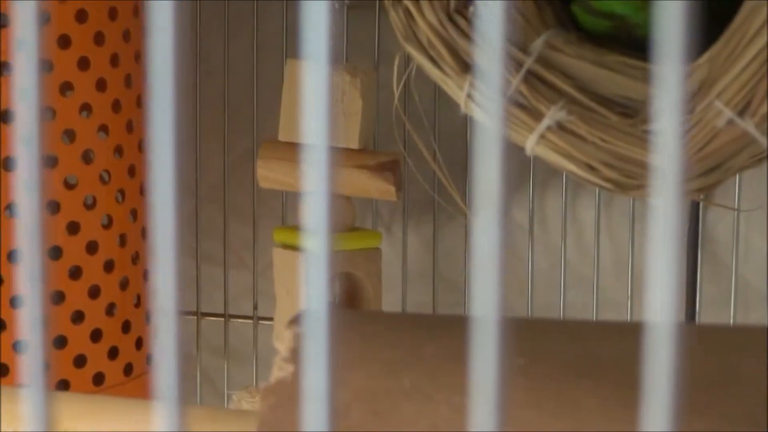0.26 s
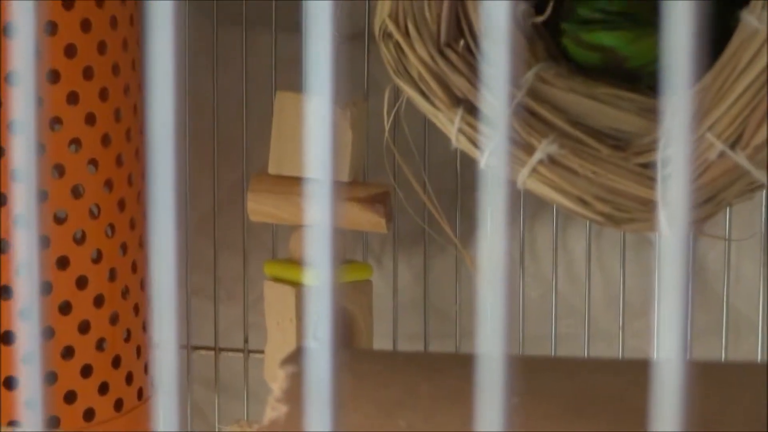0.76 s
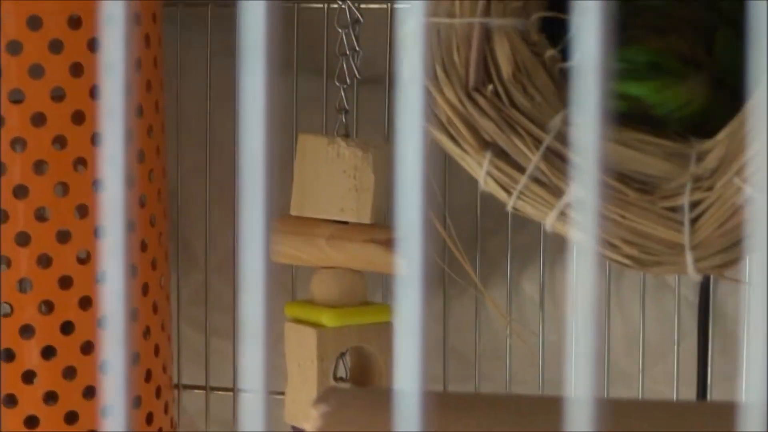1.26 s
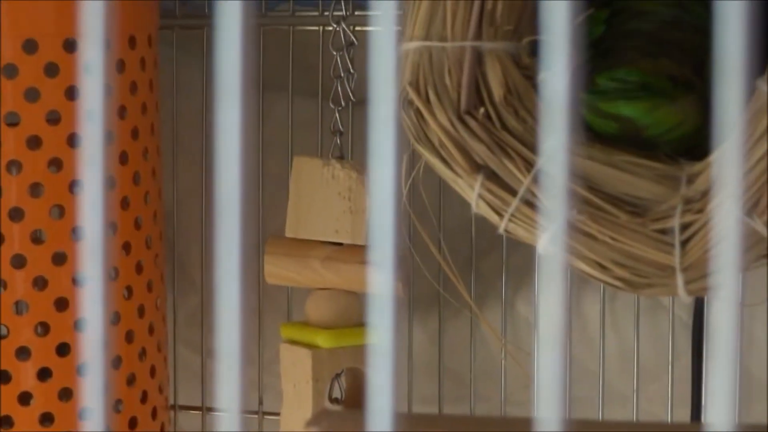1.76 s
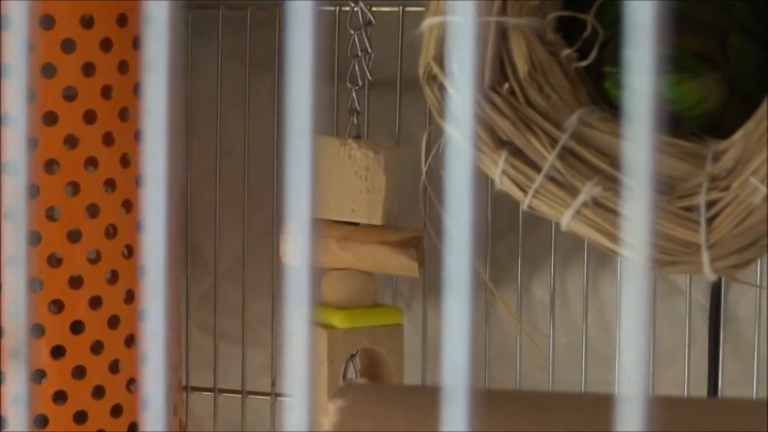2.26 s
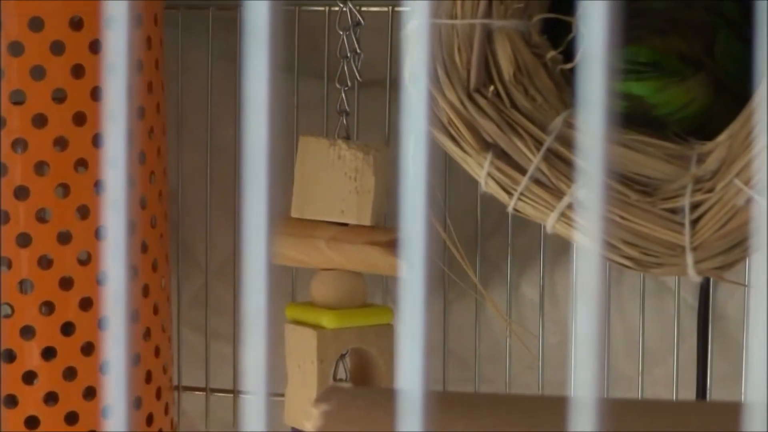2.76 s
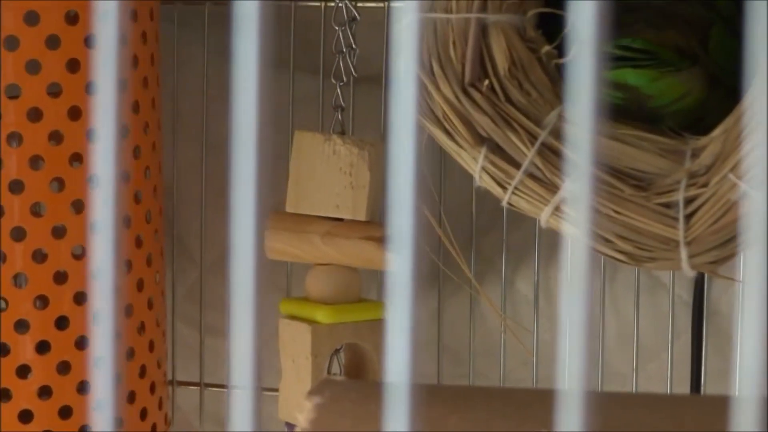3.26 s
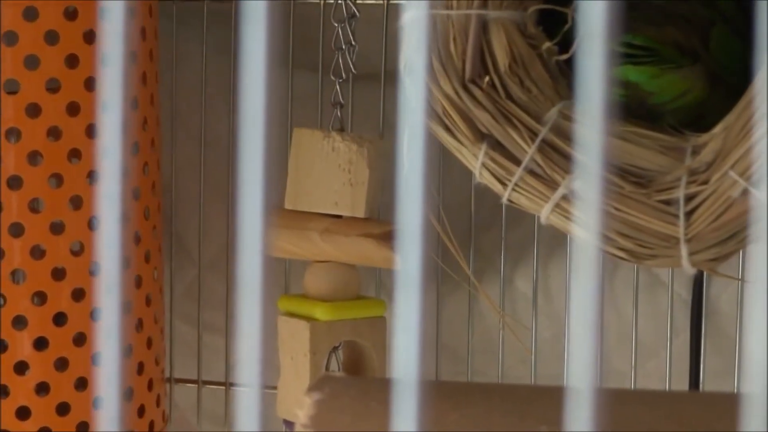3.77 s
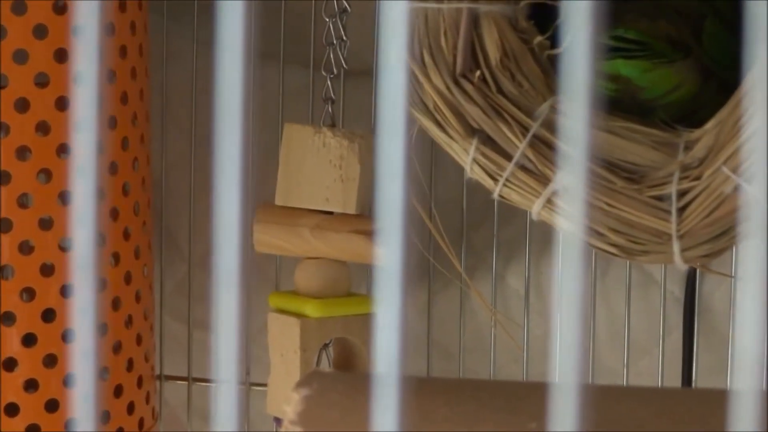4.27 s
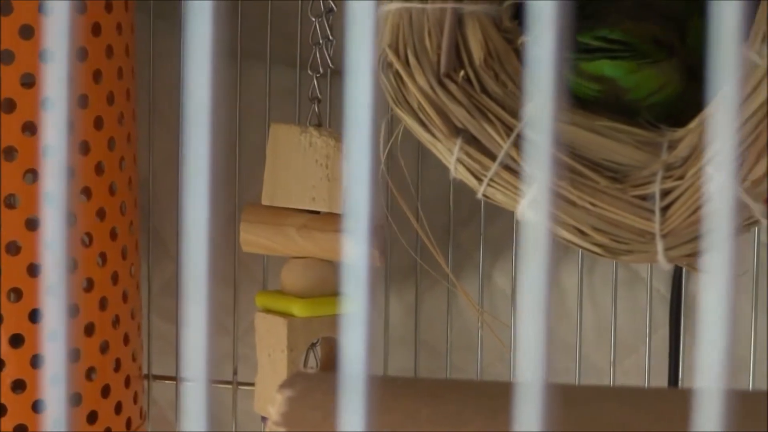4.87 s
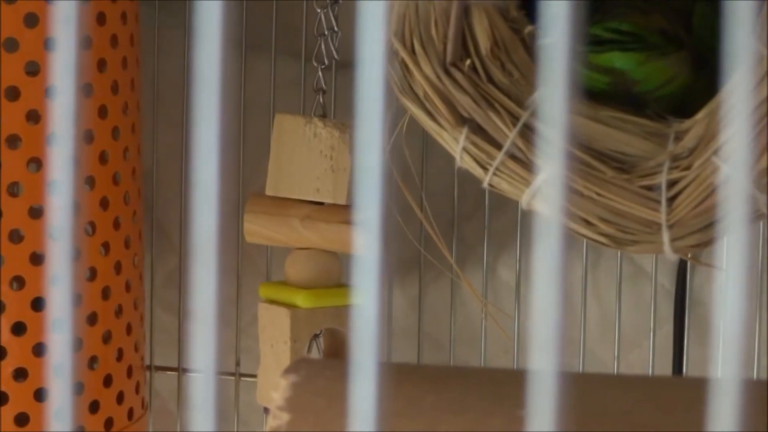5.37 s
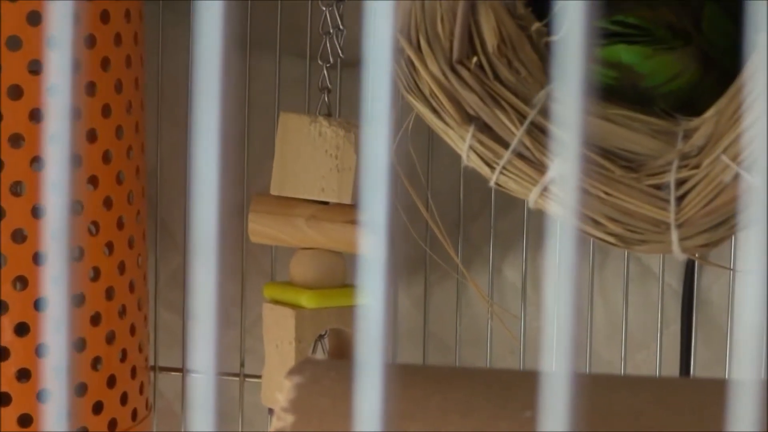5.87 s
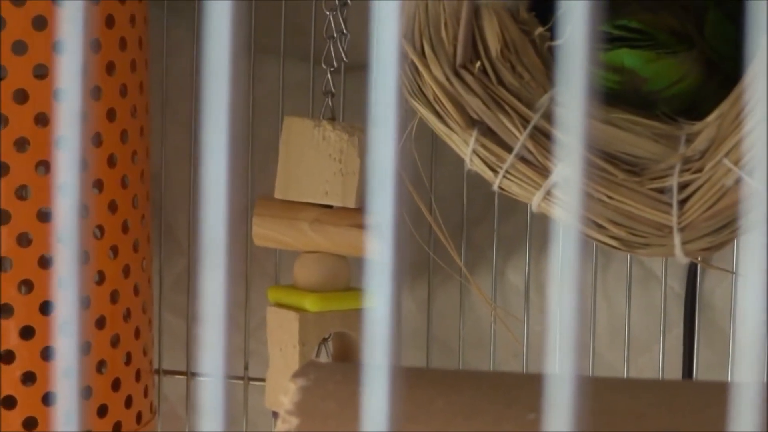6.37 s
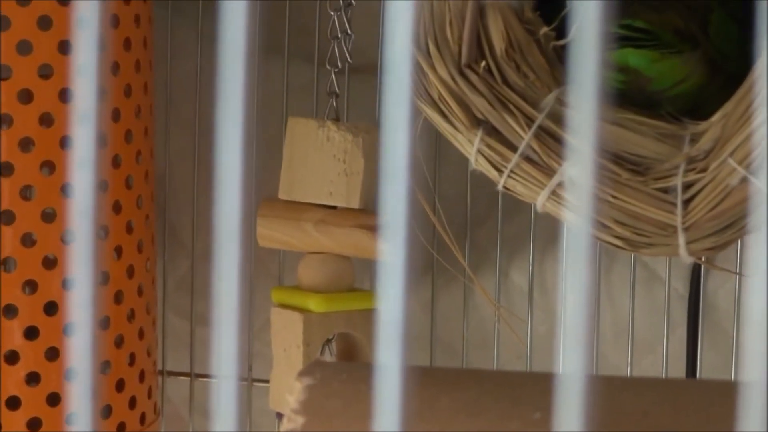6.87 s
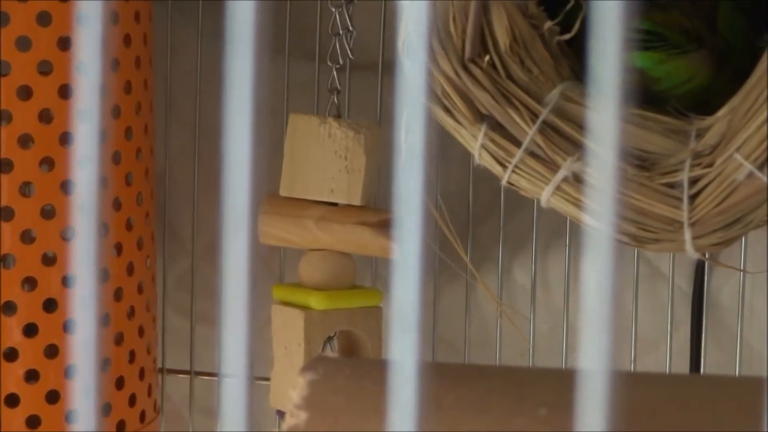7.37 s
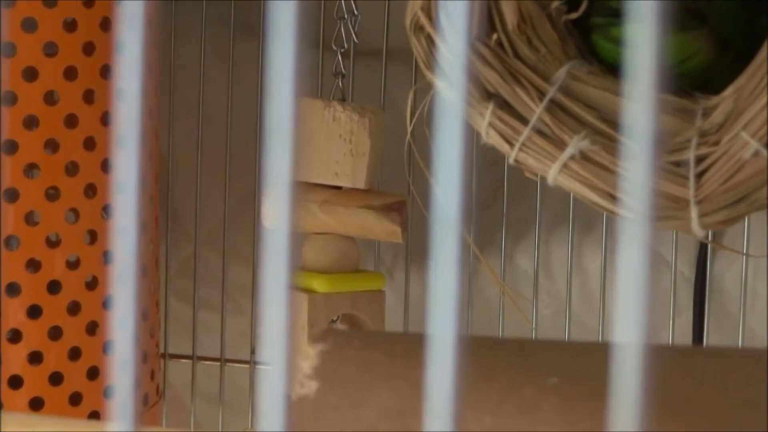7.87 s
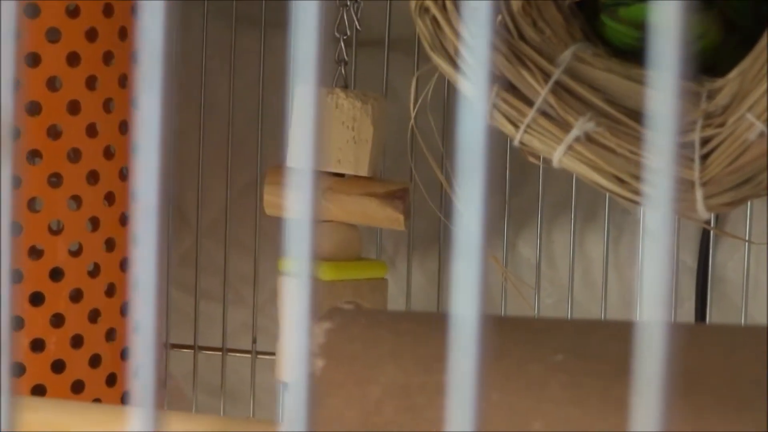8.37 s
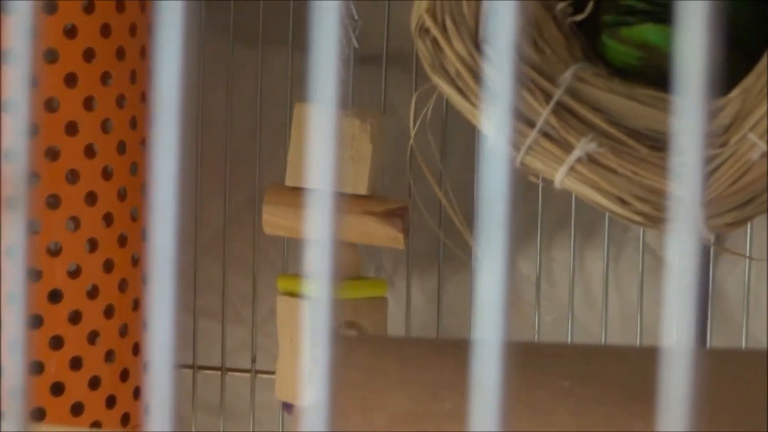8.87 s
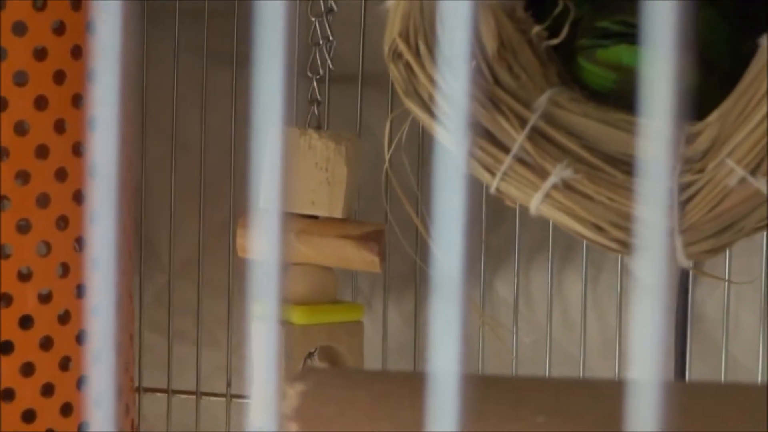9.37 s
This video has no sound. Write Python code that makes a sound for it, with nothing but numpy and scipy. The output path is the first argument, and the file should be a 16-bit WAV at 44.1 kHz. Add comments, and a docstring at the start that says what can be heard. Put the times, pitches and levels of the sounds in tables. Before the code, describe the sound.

A soft, airy hush of a quiet room runs throughout, for about ten seconds. In the first half second there is a faint rustle and a small tick from a cage. From about 0.7 to 2.4 seconds a small parrot, close and slightly to the right, gives a string of tiny chirps, roughly five a second, sinking in pitch. Two clear, gently arched peeps follow at 2.5 and 2.8 seconds, then one very faint chirp at 3. Quick bursts of high, sliding warble, hoarse at moments, come at about 4.3 and 5 seconds, with a shorter third at 7.2. A faint dull bump falls at 5.7 seconds and a light tick at 8.1. Near 8.8 seconds the bird makes a short, rattling buzz that rises in pitch, and then only the hush remains. The calls carry a slight, short room echo.

```python
"""An airy hush and faint ticks in a cage come first, in a quiet room. Close by, a small dozing parrot
gives tiny chirps that sink in pitch, two clear peeps, three bursts of sliding warble and a rising buzz.
All its calls follow the source-filter principle: the harmonics of the syrinx, steered by pitch and
effort, slide through the fixed resonances of the throat. Modulation adds flutter and turbulence rasp.
The cage, a near wall and a short room tail reflect the sound."""
import sys
import numpy as np
from scipy import signal
from scipy.fft import rfft, irfft, next_fast_len
from scipy.io import wavfile
from scipy.ndimage import uniform_filter1d, minimum_filter1d

SR = 44100
rng = np.random.default_rng(int(sys.argv[2]) if len(sys.argv) > 2 else 0)


def materialize(psi):
    """Save the field psi as 16-bit PCM at rate SR to the path in sys.argv[1].

    A 1-D psi becomes a single channel; in a 2-D psi each row is a channel.
    """
    bounded = np.clip(np.atleast_2d(psi).T, -1, 1)
    quanta = np.round(bounded * 32767).astype(np.int16)
    wavfile.write(sys.argv[1], SR, quanta)


N = 423801

# background spectrum of the room: f/Hz, relative density/dB
HUSH_SPECTRUM = [(24, -72), (40, -31), (137, -22.5), (209, -20.5), (363, -10.5), (529, -7.5), (585, -7.5),
                 (715, -6.5), (918, -7), (1270, 0), (2440, -14.5), (2770, -13), (3060, -15), (14800, -22),
                 (16000, -31)]
# left-right likeness of the background: f/Hz, correlation (-1..1)
HUSH_CORRELATION = [(60, -0.39), (200, 0.37), (400, -0.44), (800, -0.38), (1400, -0.39), (3100, 0.13),
                    (7000, 0.47), (15000, 1)]
# faint steady tones in the room: f/Hz, level/dB
WHINE_TONES = [(737.5, -69), (1249, -71.5)]
# knocks and rustles: t/s, level/dB, centre f/Hz, width/octaves, rise/s, decay/s
KNOCK_BURSTS = [(0.164, -48, 8000, 1.8, 0.012, .014), (.434, -37.5, 2470, 0.99, 0.0012, 0.0012),
                (5.706, -50.5, 150, 0.87, 0.014, .022), (7.85, -61, 140, .6, .02, .03),
                (8.09, -45.5, 2460, 0.41, 0.008, 0.012)]
# resonances and dips of the throat and beak: f/Hz, gain/dB
THROAT_RESPONSE = [(1550, -7.5), (1900, 0), (2500, 1), (3500, 1), (4300, 0), (5000, -10), (6000, -4.5),
                   (7200, 0.55), (9000, 2.5), (11000, 2), (12500, -2.5), (16000, -12)]
# air rushing through a hoarse voice: f/Hz, relative density/dB
RUSH_SPECTRUM = [(400, -47), (700, -23.5), (950, -2), (1400, -9), (2200, 4.5), (3700, -4), (4950, -15.5),
                 (6100, -1), (7500, -7.5), (11000, -6.5), (16000, -17)]
# chirps: t/s, duration/s, effort/dB, pitch f/Hz, glide/octaves, rasp (0..1)
CHIRP_CALLS = [(.656, 0.019, -19.5, 4150, -0.71, .18), (0.666, 0.021, -24, 2696, -0.75, 0.99),
               (.888, .019, -16, 3457, -0.26, 0.11), (1.099, .0092, -19, 3314, -.06, 0.29),
               (1.268, .011, -16.5, 3205, 0.097, 0.24), (1.481, .011, -18, 3305, -0.2, 0.15),
               (1.65, 0.014, -20, 2824, 0.13, .45), (1.806, 0.0087, -19.5, 2363, 0.096, 0.36),
               (2.007, .016, -24, 1851, -0.082, 0.43), (2.195, 0.0084, -21, 1548, -0.091, 0.17),
               (2.357, .034, -21, 1564, -0.054, 0.1), (3.068, .021, -32, 2165, 0.144, 0)]
# modulation of a chirp by its pitch: f/Hz, flutter depth (0..1)
FLUTTER_BY_PITCH = [(1550, 0.1), (2500, 0.81), (3400, .7), (4200, 0.6)]
# one contour a peep: t/s, pitch f/Hz, effort/dB
PEEP_CONTOURS = [
    [(2.54, 1990, -20.5), (2.559, 2104, -12), (2.607, 2068, -13), (2.615, 1994, -26)],
    [(2.746, 1843, -17.5), (2.762, 1837, -14), (2.787, 2082, -14.5), (2.811, 2035, -14.5),
     (2.828, 1787, -23)],
]
# one contour a warbled syllable: t/s, pitch f/Hz, effort/dB
WARBLE_CONTOURS = [
    [(4.306, 1833, -20), (4.313, 3453, -21.5), (4.324, 4020, -12.5), (4.344, 3594, -11), (4.35, 5200, -15),
     (4.36, 5660, -7.5), (4.384, 5050, -18.5), (4.396, 4270, -12.5), (4.405, 3350, -18.5),
     (4.42, 3220, -23.5)],
    [(4.42, 3090, -26), (4.428, 3610, -18), (4.452, 3670, -12.5), (4.456, 5340, -15), (4.468, 5950, -3.5),
     (4.48, 5580, -12), (4.489, 2744, -12.5), (4.498, 1864, -14), (4.508, 2670, -20), (4.519, 2920, -26)],
    [(4.982, 2825, -17), (4.992, 4970, -20.5), (5.015, 5760, -13.5), (5.028, 5290, -19),
     (5.049, 3770, -12.5), (5.063, 5370, -15), (5.099, 4050, -29.5), (5.111, 4040, -16), (5.122, 3900, -32)],
    [(5.138, 3200, -16.5), (5.147, 3620, -22.5)],
    [(5.158, 4310, -12), (5.165, 3250, -14.5), (5.175, 3540, -9.5), (5.179, 3860, -34), (5.187, 5460, -8)],
    [(5.187, 5230, -7.5), (5.191, 3420, -11), (5.195, 2793, -20.5), (5.202, 2797, -17.5),
     (5.206, 3920, -12.5), (5.212, 4140, -10.5), (5.22, 2590, -16.5), (5.233, 2547, -20),
     (5.244, 3463, -15), (5.254, 3375, -19.5)],
    [(7.168, 2393, -30.5), (7.174, 2425, -24), (7.204, 2820, -22.5)],
    [(7.204, 3020, -23), (7.207, 3440, -13), (7.212, 3600, -11.5), (7.218, 2200, -19), (7.242, 2684, -16.5),
     (7.248, 4020, -12), (7.258, 3570, -12.5), (7.266, 4440, -14), (7.276, 4500, -21)],
    [(7.307, 2575, -15), (7.31, 2086, -15), (7.321, 2346, -17), (7.325, 2420, -34)],
]
# hoarse moments in the warbles: t/s, half width/s, added rasp (0..1)
HOARSE_MOMENTS = [(4.353, 0.012, 0), (4.419, .011, 0.5), (5.179, 0.0034, 0.2), (7.192, 0.013, 1)]
# contour of the closing buzz: t/s, pitch f/Hz, effort/dB, pulse rate/Hz
BUZZ_CONTOUR = [(8.766, 2210, -33.5, 145), (8.795, 2180, -24, 140), (8.828, 2080, -27, 209),
                (8.865, 2495, -19.5, 188), (8.9, 3086, -21.5, 185), (8.945, 3180, -20, 145),
                (8.984, 3350, -19.5, 109)]
# hollow colour of the half-shut beak: f/Hz, gain/dB
BEAK_RESPONSE = [(600, -1.5), (1000, 2.5), (1350, 0), (2300, 0.5), (3900, 0), (5000, -8), (6000, 2.5),
                 (9000, 0), (10500, -7), (12500, 3)]
# reverberation time of the room: f/Hz, T60/s
ROOM_T60 = [(1000, 0.37), (2500, 0.22), (7000, 0.2), (14000, 0.21)]

EDGE_HZ = 16000  # upper band limit


def amp(db):
    """Amplitude ratio of a level in decibels."""
    return 10 ** (np.asarray(db) / 20)


def unit_rms(x):
    """Normalisation to unit mean power."""
    return x / np.sqrt(np.mean(x ** 2) + 1e-20)


def read(points, hz):
    """Interpolation of a table on a logarithmic frequency axis."""
    f, value = np.transpose(points)
    return np.interp(np.log(hz + 1), np.log(f), value)


def add(mix, start_s, sound):
    """Superposition of a sound on the mix, from start_s on."""
    part = mix[round(start_s * SR):][:len(sound)]
    part += sound[:len(part)]


def filtered(x, gain):
    """Linear filtering: the spectrum is multiplied by gain(f)."""
    size = next_fast_len(len(x) + 2048)
    return irfft(rfft(x, size) * gain(np.fft.rfftfreq(size, 1 / SR)), size)[:len(x)]


def bandpass(x, centre_hz, octaves):
    """A passband that is Gaussian in log frequency."""
    return filtered(x, lambda f: np.exp(-.5 * (np.log2((f + 1) / centre_hz) / octaves) ** 2))


def wander(size, hz):
    """Low-pass noise of unit rms: smooth random motion up to about hz."""
    return unit_rms(filtered(rng.standard_normal(size), lambda f: 1 / (1 + (f / hz) ** 4)))


def stereo_pair(a, b, correlation):
    """Partial coherence: the sum and difference of two independent spectra form left and right."""
    c = np.clip(correlation, -.99, .99)
    mid, side = a * np.sqrt((1 + c) / 2), b * np.sqrt((1 - c) / 2)
    return np.array([mid + side, mid - side])


def flicker(air, centre_hz=1300, octaves=.35, depth=0.18, rate_hz=25):
    """Random amplitude modulation of one band makes the middle of the hush flicker."""
    band = np.array([bandpass(side, centre_hz, octaves) for side in air])
    return air + depth * wander(N, rate_hz) * band


def hush(level_db=-47.0):
    """Partly coherent broadband noise, with a faint whine of two tones that drift in phase."""
    hz, t = np.fft.rfftfreq(N, 1 / SR), np.arange(N) / SR
    a, b = rfft(rng.standard_normal((2, N)))
    spectra = stereo_pair(a, b, read(HUSH_CORRELATION, hz)) * amp(read(HUSH_SPECTRUM, hz))
    air = unit_rms(irfft(spectra, N))
    whine = sum(amp(db) * np.sqrt(2) * np.sin(2 * np.pi * f * t + 0.92 * wander(N, 4.6))
                for f, db in WHINE_TONES)
    return amp(level_db + 0.25 * wander(N, 3.7)) * flicker(air) + whine


def knocks():
    """Damped transients: cage ticks, rustles and two dull bumps are noise bands decaying exponentially."""
    out = np.zeros(N)
    t = np.arange(SR // 5) / SR
    for start, db, centre_hz, octaves, rise, decay in KNOCK_BURSTS:
        burst = unit_rms(bandpass(rng.standard_normal(len(t)), centre_hz, octaves))
        envelope = np.minimum(t / rise, np.exp((rise - t) / decay))
        add(out, start, amp(db) * burst * envelope)
    return out


def syrinx(t, hz, effort_db, flutter, rasp, bright_db, even_db=0, rush_db=1.0, flutter_hz=168,
           swing=0.132, jitter=0.079, tremor=0.0066, shimmer_db=1, edge_s=0.0014):
    """Source and filter: harmonics pass the throat; flutter pulses them, rasp adds jitter and air."""
    flutter, rasp = np.clip(flutter, 0, 1), np.clip(rasp, 0, 1)
    pulse_cycles = np.cumsum(flutter_hz * (1 + 0.127 * wander(len(t), 80))) / SR
    opening = -np.cos(2 * np.pi * pulse_cycles + .5)
    pressure_bend = swing * flutter * (opening - .5)  # pitch rises with the pressure of each pulse
    unsteadiness = (tremor + jitter * rasp) * wander(len(t), 830)
    pitch = hz * (1 + pressure_bend + unsteadiness)
    phase = 2 * np.pi * np.cumsum(pitch) / SR
    k = np.arange(1, 11)[:, None]  # harmonic numbers
    # effort above that of an ordinary call, -10 dB, brightens the source
    db_per_octave = -6 + bright_db + 0.3 * (effort_db + 10)
    source_db = db_per_octave * np.log2(k) + even_db * (k % 2 == 0)
    weights = amp(source_db + read(THROAT_RESPONSE, k * pitch)) * (k * pitch < EDGE_HZ)
    tone = np.sqrt(2) * (weights * np.cos(k * phase + np.pi * k ** 2 / 4)).sum(0)
    tone *= 1 + 0.45 * rasp * np.cos(phase / 2)  # period doubling: strong and weak cycles alternate
    turbulence = rng.standard_normal(len(t)) * (1 + 0.34 * np.cos(phase))
    rush = unit_rms(filtered(turbulence, lambda f: amp(read(RUSH_SPECTRUM, f))))
    pulses = (1 + flutter * opening) / np.sqrt(1 + flutter ** 2 / 2)
    edges = np.clip(np.minimum(t - t[0], t[-1] - t) / edge_s, 0, 1)
    envelope = amp(effort_db + shimmer_db * wander(len(t), 230)) * edges * pulses
    return envelope * (np.sqrt(1 - rasp ** 2) * tone + amp(rush_db) * rasp * rush)


def chirps(arch_octaves=0.034, fade_db=1):
    """Amplitude modulation cuts each tiny call into pulses while its pitch arches and glides."""
    out = np.zeros(N)
    for start, length, effort_db, hz, glide, rasp in CHIRP_CALLS:
        u = np.linspace(-.5, .5, max(round(length * SR), 2))  # position about the middle of the chirp
        t = start + (u + .5) * length
        pitch = hz * 2 ** (glide * u + arch_octaves * np.cos(2 * np.pi * u) / 2)
        flutter = read(FLUTTER_BY_PITCH, hz)
        voice = syrinx(t, pitch, effort_db - fade_db * u, flutter, rasp, bright_db=2.7, shimmer_db=0.2)
        add(out, start, voice)
    return out


def gesture(contour, glide_s=.002):
    """Time and controls of one syllable; a moving average rounds every turn."""
    times, *columns = np.transpose(contour)
    t = np.arange(times.min() - .001, times.max() + .001, 1 / SR)
    return [t] + [uniform_filter1d(np.interp(t, times, c), size=round(glide_s * SR)) for c in columns]


def peeps(onset_rasp=0.55, onset_s=.003):
    """Nearly periodic vibration gives clear, gently arched notes after a scratchy onset transient."""
    out = np.zeros(N)
    for t, hz, effort_db in map(gesture, PEEP_CONTOURS):
        rasp = 0.0079 + onset_rasp * np.exp((t[0] - t) / onset_s)
        voice = syrinx(t, hz, effort_db, flutter=0, rasp=rasp, bright_db=-.5, even_db=-0.5,
                       tremor=0.0024, shimmer_db=0.2)
        add(out, t[0], voice)
    return out


def warbles(clear_rasp=0.019, wobble=.014):
    """Frequency modulation: syllables slide unsteadily and leap between registers, at times hoarse."""
    out = np.zeros(N)
    for t, hz, effort_db in map(gesture, WARBLE_CONTOURS):
        hoarseness = sum(peak * np.exp(-((t - when) / half) ** 2) for when, half, peak in HOARSE_MOMENTS)
        unsteady_hz = hz * (1 + wobble * wander(len(t), 180))
        voice = syrinx(t, unsteady_hz, effort_db, flutter=0.044, rasp=clear_rasp + hoarseness,
                       bright_db=1.6, tremor=0.0084, shimmer_db=2.0)
        add(out, t[0], voice)
    return out


def buzz():
    """Deepening modulation makes a rising rattle, filtered to a hollow colour by the half-shut beak."""
    out = np.zeros(N)
    t, hz, effort_db, pulse_hz = gesture(BUZZ_CONTOUR)
    flutter = np.linspace(.45, .8, len(t))
    rasp = np.linspace(0.37, 0.21, len(t))
    voice = syrinx(t, hz, effort_db, flutter, rasp, bright_db=1.5, even_db=-2, rush_db=0.5,
                   flutter_hz=pulse_hz, swing=.15, jitter=.11, shimmer_db=3.5)
    add(out, t[0], filtered(voice, lambda f: amp(read(BEAK_RESPONSE, f))))
    return out


def room(x, wall_s=0.0057, wall_db=-22, cage_decay_s=0.0097):
    """Convolution adds one wall reflection, quick scatter from the cage and a short diffuse tail."""
    size = SR // 2
    t, hz = np.arange(size) / SR, np.fft.rfftfreq(size, 1 / SR)
    f, when, noise = signal.stft(rng.standard_normal((2, size)), SR, nperseg=256)
    decay = amp(-60 * when / read(ROOM_T60, f)[:, None])
    tail = signal.istft(noise * decay, SR, nperseg=256)[1][:, :size] * (t > .008)
    scatter = rng.standard_normal((2, size)) * np.exp(-t / cage_decay_s) * (t > .002)
    a, b = rfft(amp(-24) * unit_rms(tail) + amp(-20) * unit_rms(scatter)) / np.sqrt(size)
    correlation = 0.68 + read([(2000, 0.015), (10000, 0.21)], hz)  # the sides share more of the treble
    colour = amp(read([(3000, 9.5), (12000, 1.5)], hz))  # the walls absorb treble
    echoes = irfft(stereo_pair(a, b, correlation) * colour, size)
    echoes[:, round(wall_s * SR)] += amp(wall_db)
    return x + signal.fftconvolve(x[None], echoes, axes=1)[:, :N]


def limiter(x, ceiling=.95, hold_s=0.008):
    """Peak limiting: the gain falls smoothly around any peak above the ceiling."""
    size = round(hold_s * SR)
    gain = minimum_filter1d(ceiling / np.maximum(abs(x).max(0), ceiling), size=2 * size)
    return x * uniform_filter1d(uniform_filter1d(gain, size=size), size=size)


def scene():
    """The sources superpose; a level difference places the bird and its cage a little to the right."""
    bird = amp(1.54) * chirps() + amp(2.2) * peeps() + amp(2.55) * warbles() + amp(8.3) * buzz()
    return room(bird + knocks()) * amp([[-.25], [.25]]) + hush()


def record(dry, threshold_db=-13, recovery_db_per_s=4, squeeze=0.35):
    """Compression: gain dips at loud calls and recovers slowly; a limiter and a low-pass follow."""
    power_db = 10 * np.log10(abs(uniform_filter1d((dry ** 2).mean(0), size=300)) + 1e-12)
    fall_db = np.arange(N) * recovery_db_per_s / SR
    peak_db = np.maximum.accumulate(power_db + fall_db) - fall_db  # held peak, sinking at that rate
    excess_db = np.maximum(peak_db - threshold_db, 0)
    reduction_db = squeeze * uniform_filter1d(excess_db, size=200)
    limited = limiter(dry / amp(reduction_db))
    lowpass = signal.firwin(255, EDGE_HZ, window=("kaiser", 9), fs=SR)
    return signal.oaconvolve(limited, lowpass[None], "same")


dry = scene()
out = record(dry)
materialize(out)
```